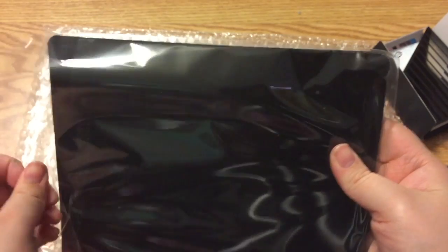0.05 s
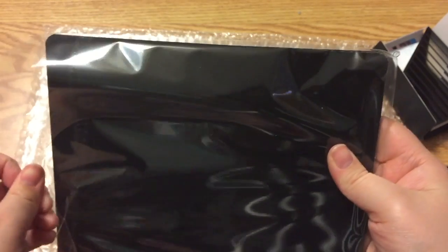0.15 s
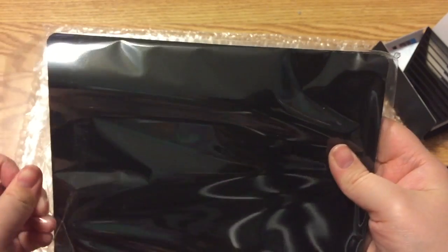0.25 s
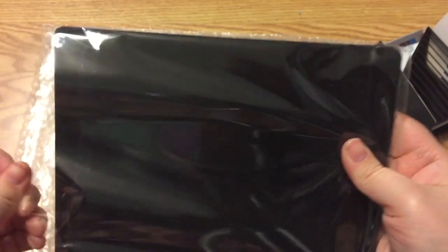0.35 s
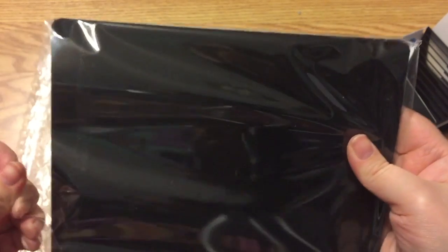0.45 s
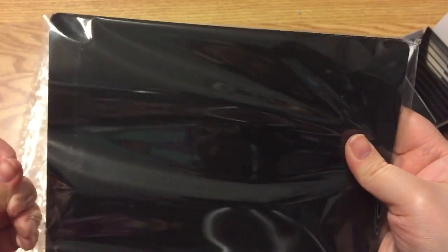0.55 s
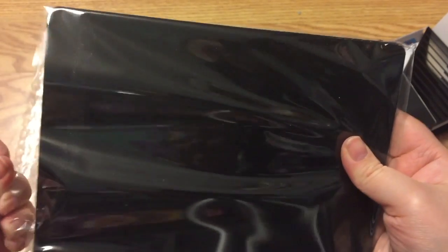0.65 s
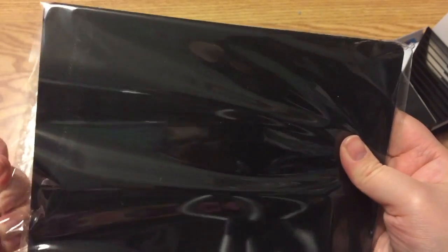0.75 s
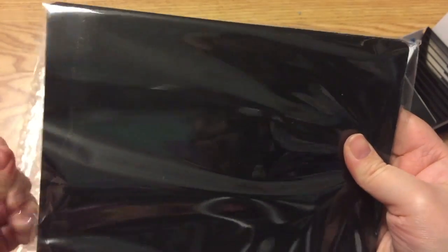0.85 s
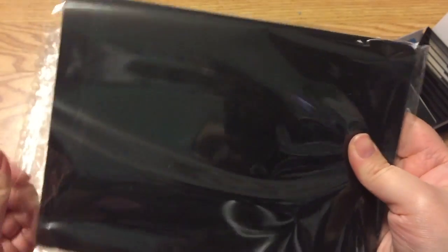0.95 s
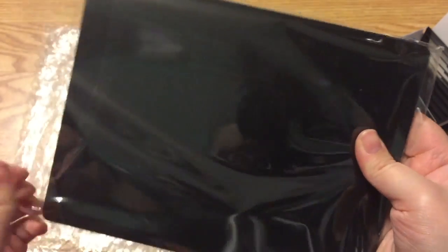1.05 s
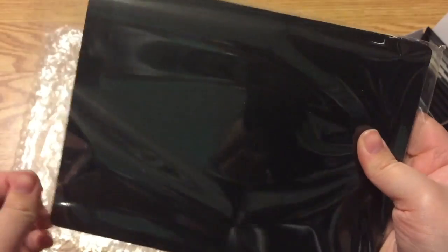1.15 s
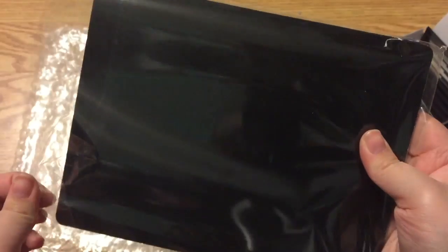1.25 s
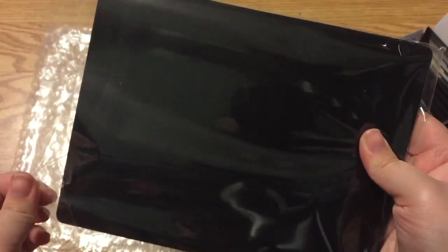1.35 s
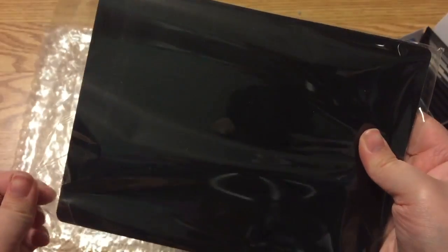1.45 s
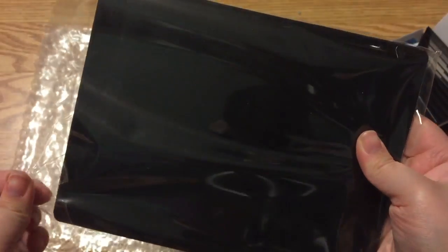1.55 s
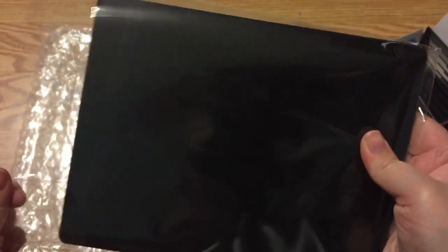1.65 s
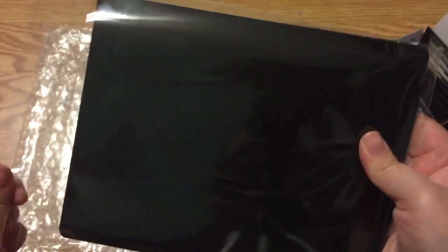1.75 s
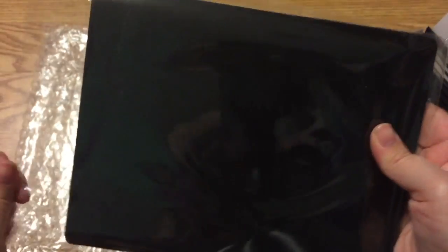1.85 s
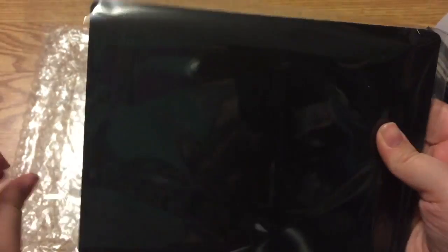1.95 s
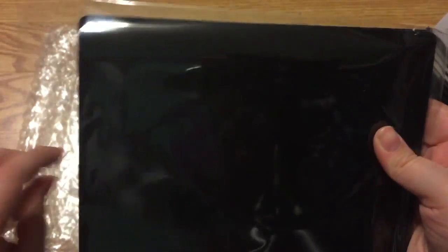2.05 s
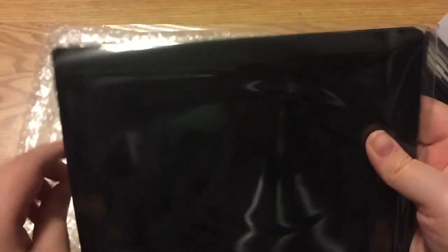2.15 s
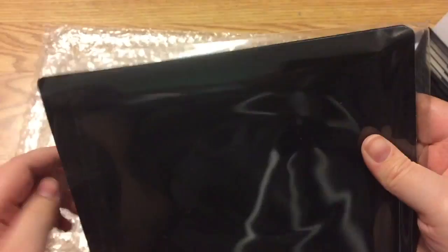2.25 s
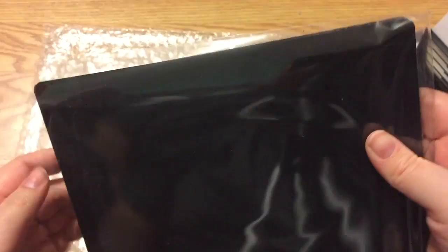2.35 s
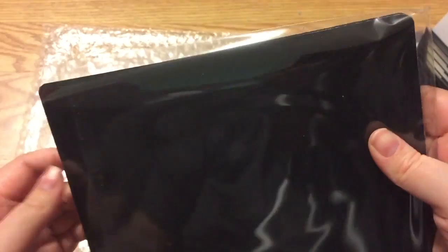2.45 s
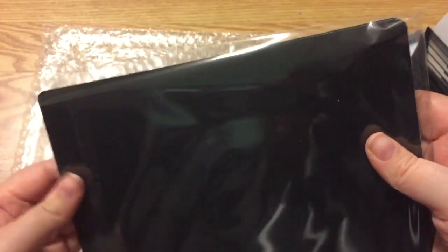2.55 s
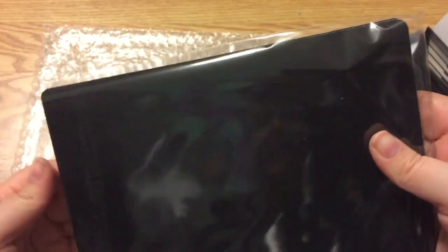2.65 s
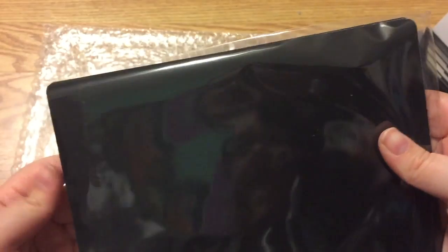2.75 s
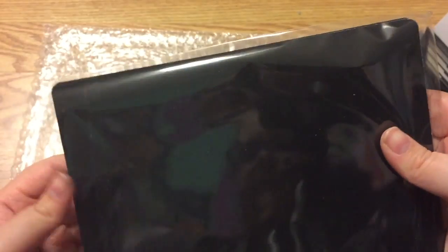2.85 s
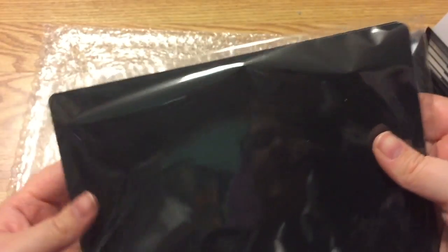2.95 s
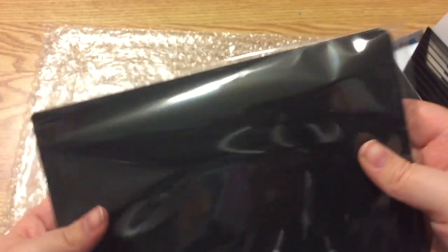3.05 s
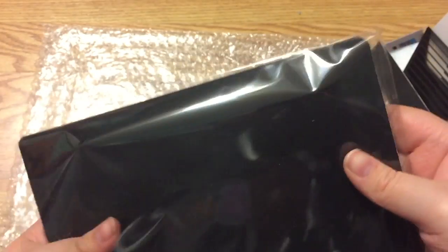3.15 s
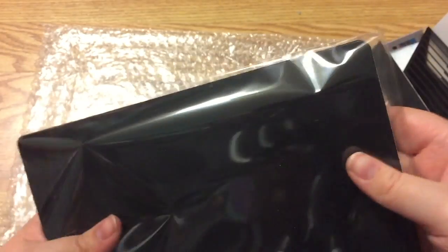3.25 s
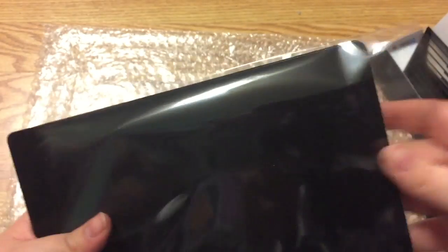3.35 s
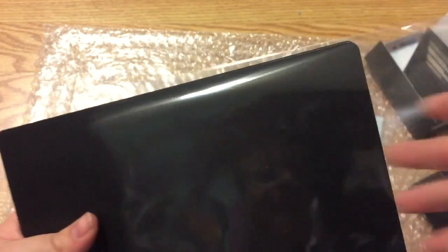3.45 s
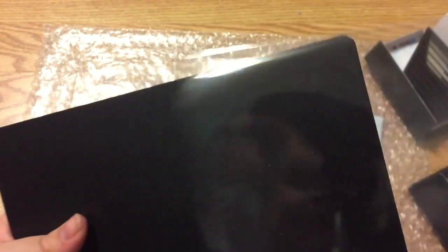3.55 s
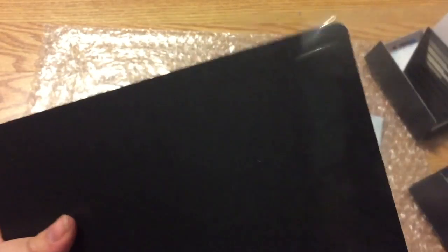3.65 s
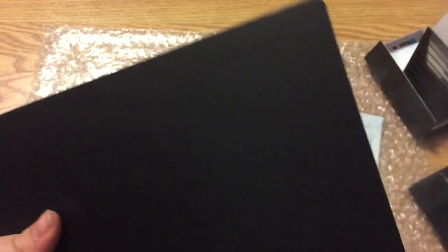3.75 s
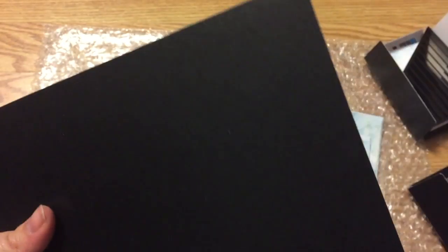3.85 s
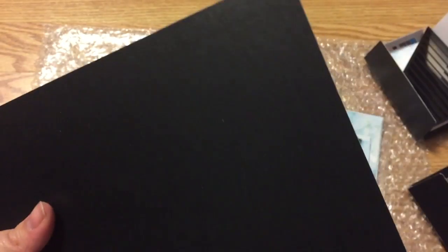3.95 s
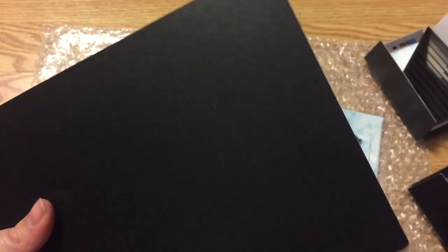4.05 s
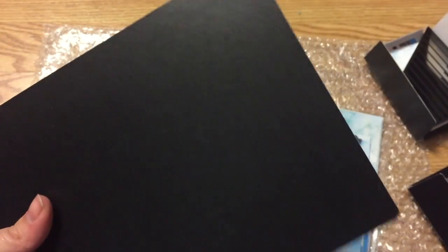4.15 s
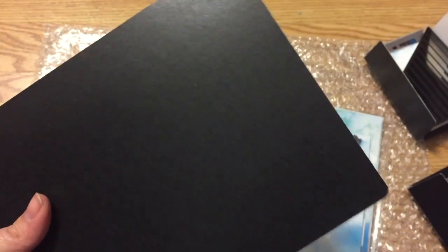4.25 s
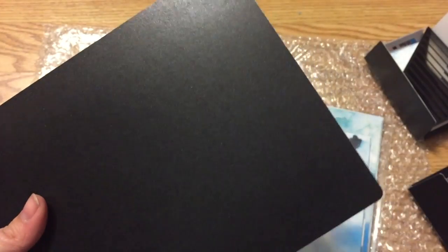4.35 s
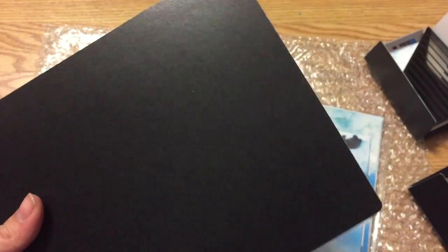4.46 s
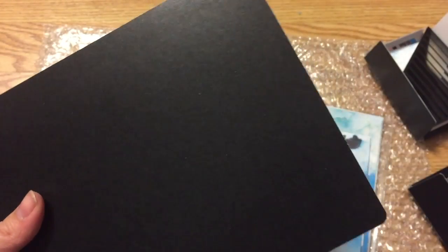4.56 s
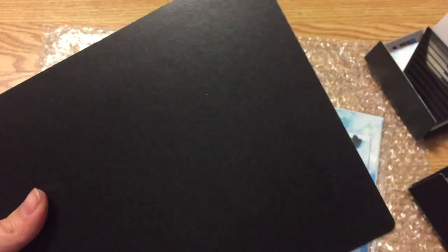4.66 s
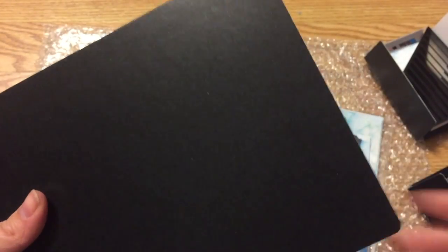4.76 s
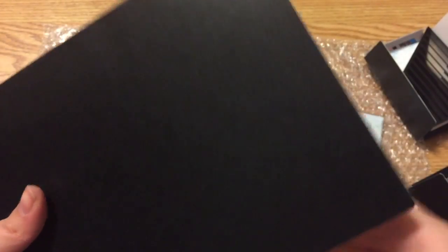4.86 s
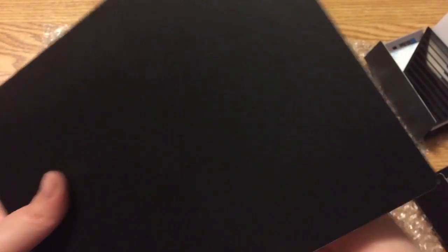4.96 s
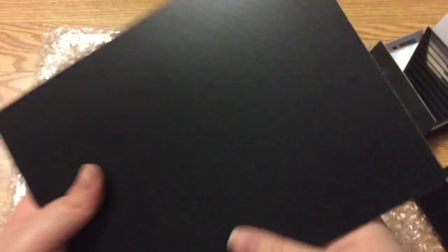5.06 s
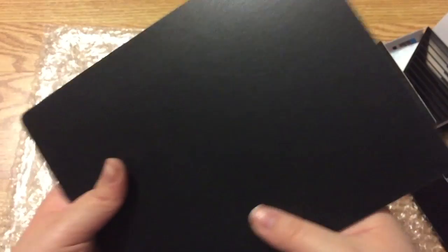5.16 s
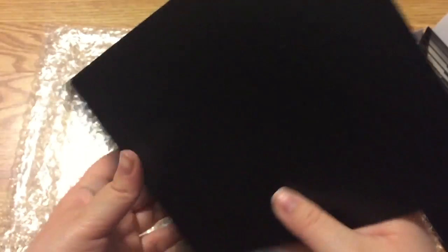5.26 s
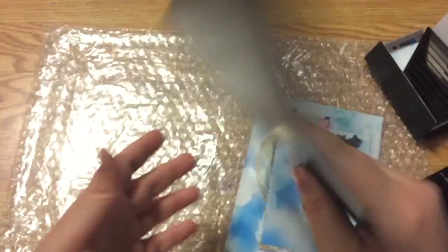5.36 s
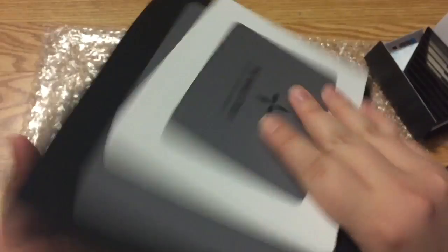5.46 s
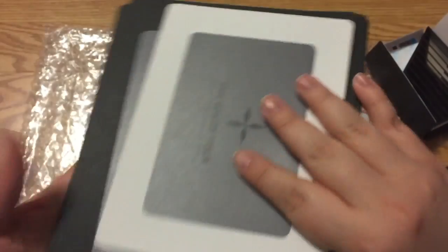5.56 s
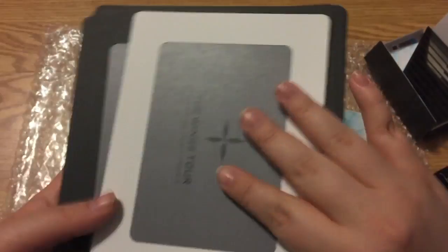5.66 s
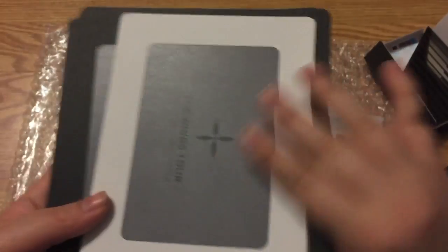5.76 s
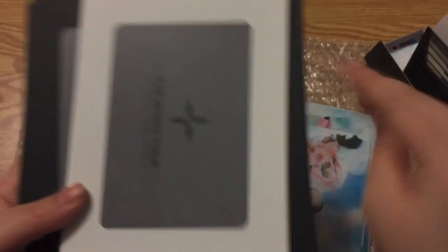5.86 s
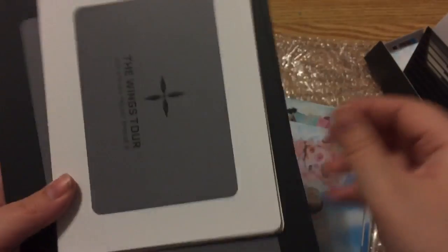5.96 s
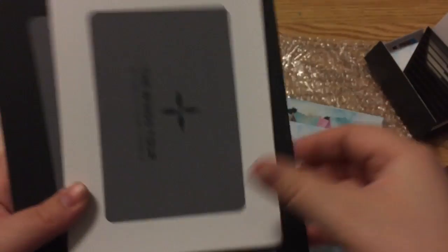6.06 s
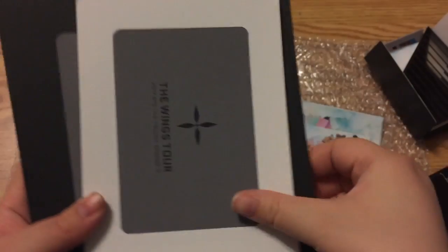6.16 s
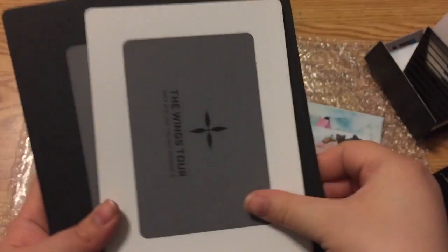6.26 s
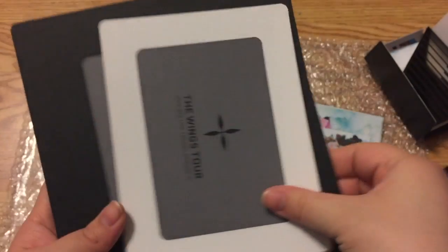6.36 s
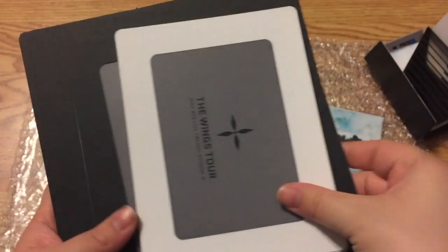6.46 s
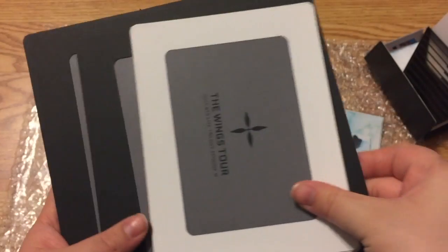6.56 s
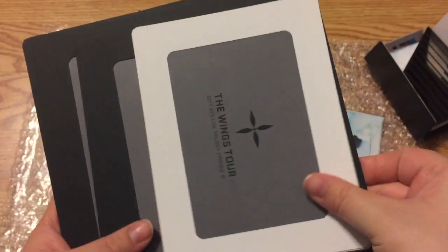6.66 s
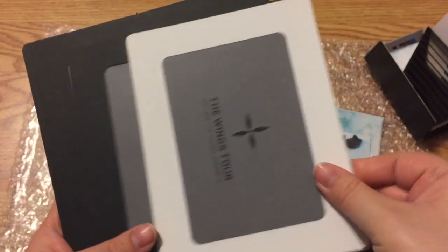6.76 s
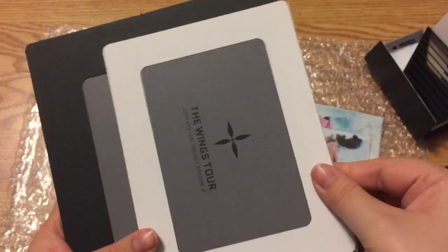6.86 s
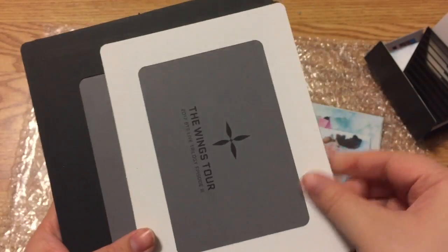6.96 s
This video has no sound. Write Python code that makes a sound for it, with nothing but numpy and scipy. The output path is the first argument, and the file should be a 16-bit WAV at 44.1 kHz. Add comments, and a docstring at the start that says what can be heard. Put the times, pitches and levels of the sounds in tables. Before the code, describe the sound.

A plastic sleeve crackles and snaps in uneven bursts close to the microphone, with dull little thumps from the stiff card inside. The crinkling thins out and gives way to a bright swish as the card is pulled free. Quieter handling follows, with scattered taps and a soft finger rub near the end, at a table in a quiet room with a faint fan hum.

```python
"""At a table in a quiet room, hands pull a stiff card folder out of a clear plastic sleeve, up close,
then turn it over. Creases in the film snap through with a crack, a short rattle and a thump from the card.
Film and fingers stick and slip over the card in short strokes and long slides, and the card flexes low.
Table and walls add a short tail; underneath, a fan hums faintly in the room tone."""
import sys
import numpy as np
from scipy import signal
from scipy.fft import rfft, irfft, next_fast_len
from scipy.io import wavfile
from scipy.ndimage import uniform_filter1d

SR = 44100
rng = np.random.default_rng(int(sys.argv[2]) if len(sys.argv) > 2 else 0)


def output_pcm(signal):
    """Save a mono or channel-first signal as 16-bit PCM at the path in sys.argv[1].

    Samples are clipped to [-1, 1] before scaling.
    """
    pcm = np.clip(np.atleast_2d(signal).T, -1, 1) * 32767
    wavfile.write(sys.argv[1], SR, np.round(pcm).astype(np.int16))


N = 309135
T = np.arange(N) / SR

# creases snapping through: t/s, level/dB, ring f/Hz, card thump relative to the snap/dB
CREASES = [(0.0014, -19.5, 8600, -19), (0.0079, -16.5, 7150, -26), (0.0226, -17, 5970, -26),
           (0.0349, -17, 3600, -23), (0.0502, -21, 9800, -25), (0.0565, -25, 3000, -14),
           (0.0649, -32, 7200.0, -4), (0.0673, -20.5, 4300, -23), (0.1372, -20.5, 10900, -17.5),
           (0.1437, -33, 6840, -18), (0.1698, -37, 4600.0, -32), (0.2159, -43.5, 8300, -28),
           (0.2471, -30.5, 7460, -18), (0.264, -25, 4940, -25), (0.3655, -45, 4100, -12),
           (0.3748, -24.5, 4040, -22), (0.3868, -16, 10700, -13), (0.3919, -17.5, 11900, -21),
           (0.3996, -16.5, 4750, -19), (0.418, -28, 6000, -30), (0.4201, -18, 11700.0, -13),
           (0.4351, -18.5, 6900, -13), (0.5093, -43.5, 2710, -7.5), (0.5629, -36, 7700, -39),
           (0.5815, -55, 3200, -30), (0.6046, -45, 4040, -32.0), (0.6203, -46, 3700, -30),
           (0.6314, -32.0, 2830, -40), (0.6565, -35.5, 7800, -37), (0.6715, -30.5, 8800, -37),
           (0.68, -34, 8600, -37), (0.6866, -34, 6900, -12.5), (0.698, -41, 3470, -6),
           (0.7664, -27.5, 6760, -14.5), (0.831, -40.5, 4230, -28), (0.8437, -38, 2300, -23),
           (0.8736, -44.5, 1500.0, 6), (0.9212, -32, 8400, -11), (0.9518, -27.5, 3370, -30),
           (0.9605, -32, 2150, -15), (0.9697, -22.5, 12200, -21), (0.9962, -35, 9300.0, -6.5),
           (1.1144, -40.5, 3100.0, -4), (1.1236, -34.5, 3460, -10), (1.151, -24.5, 4900, -11.5),
           (1.2135, -24.5, 3600, -13.5), (1.2649, -30, 2400, -5.5), (1.3037, -53, 4600.0, -25),
           (1.3141, -32, 3020, -8.5), (1.3385, -41.5, 4300.0, -10), (1.3573, -43, 3720, -4),
           (1.4507, -30, 11900, -14.5), (1.4622, -33.5, 3750, -30), (1.5112, -31.5, 7800, -46),
           (1.5521, -30.5, 9300, -23), (1.6351, -44.5, 1500.0, 3), (1.6487, -29, 4240, -11.5),
           (1.6785, -14.5, 7700, -33), (1.6854, -16.5, 4300.0, -12), (1.6909, -17.5, 4800.0, -28),
           (1.7007, -20.5, 4340, -10), (1.7072, -22, 3900, -2), (1.7161, -17.5, 1520, -4),
           (1.7207, -24, 1760, -37), (1.8078, -38.5, 3970, -4), (1.8156, -38, 8950, -4),
           (1.8759, -44, 1500, 0.5), (1.907, -34.5, 9400, -27), (1.9132, -33.5, 6600, -7.5),
           (1.9308, -38.5, 3100.0, -2), (1.9416, -34, 4320, -35), (1.9479, -25.5, 1590, -12.5),
           (1.9513, -20, 9700, -49), (1.9639, -40, 3400.0, -22), (2.0038, -36.5, 3400.0, -18),
           (2.0431, -32, 3960, -10.0), (2.0726, -46, 4470, -4), (2.158, -37.5, 3100, -5.5),
           (2.1789, -38, 3350, -3.5), (2.2269, -38, 2100.0, -11), (2.3811, -40.5, 3050, -8),
           (2.4385, -49, 3500, -4), (2.4735, -50, 1819, 5), (2.5062, -27, 9500, -20),
           (2.539, -45, 2460, -14), (2.7075, -52, 3000, -30), (2.7865, -31.5, 5100, -17),
           (2.8959, -48, 2100.0, -8), (2.9077, -45, 2000.0, -27), (2.9625, -44, 8300, -35),
           (3.0485, -35.5, 9860, -15.5), (3.0502, -24.5, 7960, -31), (3.0878, -39.5, 4380, -10),
           (3.1442, -37, 2200.0, -18), (3.1556, -30, 4000, -18), (3.1932, -36.5, 2390, -11.5),
           (3.265, -35, 10700, -15.5), (3.2836, -41, 4080, -10.5), (3.3332, -42, 4640, -28),
           (3.346, -39, 2790, -21), (3.3629, -38, 3580, -28.0), (3.3812, -36, 3100.0, -32),
           (3.6224, -33.5, 5330, -11), (3.691, -25.5, 6750, -18.5), (3.717, -39, 7000, -30),
           (3.877, -46.5, 3580, -28), (3.9151, -49, 4200.0, -10.5), (4.2651, -50, 3550, -22),
           (4.3121, -38, 2800.0, -16), (4.3748, -32.5, 2980, -45.5), (4.4935, -54.5, 4900.0, -5),
           (4.5251, -54.5, 2400.0, -11), (4.7725, -40.5, 9080, -21), (5.3598, -48.5, 4600.0, -5),
           (5.4978, -50, 2300.0, -23), (5.5994, -49.5, 1600.0, -3.5), (5.6117, -44, 1890, -19),
           (5.808, -56, 2194, -18.5), (6.16, -59.5, 1486, -14)]


def crease_snaps(creases, ring_db=5, ring_width=0.2, low_hz=1500, treble_hz=7000, crack_s=0.00017,
                 rattle_t60=0.019, thump_t60=0.031, size=4096):
    """Each crease flips with a crack; the film rattles on for some ms and the card behind it thumps."""
    thump_spectrum = [(59, -52), (100, -16), (614, -3.5), (791, -5.5), (861, -3), (1800, -9.5), (2340, -16),
                      (3960, -120)]  # tone of the knocked card: f/Hz, level/dB
    starts, db, ring_hz, card_db = np.transpose(creases)[:, :, None]
    t = np.arange(size) / SR
    f = np.fft.rfftfreq(size, 1 / SR) + 1
    noise = rng.standard_normal((len(starts), 2, size))
    # big folds roll on longer and crack less sharply than small ones
    big_db = np.maximum(db + 32, 0)
    rattle = undb(-60 * t / rattle_t60 / np.exp(0.0357 * big_db))
    crack = undb(9.5 - 0.55 * big_db) * np.exp(-t / crack_s)
    # thin film radiates no bass; soft folds lose treble, small high facets keep more
    treble_db = -7.5 + 6 * np.log2(ring_hz / 4000)
    body = undb(treble_db / (1 + (treble_hz / f) ** 4)) / (1 + (low_hz / f) ** 2)
    # the size of the facet that flips lifts one band
    facet = 1 + undb(ring_db) * np.exp(-(np.log(f / ring_hz) / ring_width) ** 2)
    film = minimum_phase(noise[:, 0] * (rattle + crack), body * facet)
    knock = noise[:, 1] * undb(-60 * t / thump_t60) * np.tanh(t / 0.00047)
    thump = minimum_phase(knock, eq_curve(thump_spectrum, f))
    snaps = undb(db) * (unit_burst(film) + undb(card_db) * unit_burst(thump))
    out = np.zeros(N + size)
    for at, snap in zip((starts[:, 0] * SR).astype(int), snaps):
        out[at:at + size] += snap
    return out[:N]


def small_creases(per_snap=3, below_db=25, fade_db_per_s=250, spread_db=7, lead_s=0.0012, lag_s=0.022):
    """Each snap shifts the strain: one small crease gives just before, others after; rows like CREASES."""
    starts, db, ring_hz, card_db = np.repeat(CREASES, per_snap, axis=0).T
    wait, size = rng.exponential(size=(len(starts), 2)).T
    ring_scatter, thump_scatter = rng.standard_normal((len(starts), 2)).T
    follows = np.arange(len(starts)) % per_snap > 0
    delay = np.where(follows, lag_s * wait, -lead_s * (1 + np.minimum(wait, 2)))
    small_db = db - below_db - fade_db_per_s * np.maximum(delay, 0) + spread_db * np.minimum(size, 3)
    small_hz = np.clip(ring_hz * np.exp(0.68 * ring_scatter), 1500, 13000)
    thump_db = card_db - 8 + 4 * thump_scatter
    return np.c_[np.maximum(starts + delay, 0), small_db, small_hz, thump_db]


def card_friction(slips_per_s=900, slip_s=0.00043, hiss=1.1, flicker_db=1.5, patchy_db=2.8,
                  scrape_db=-12, scrape_low_hz=250):
    """Stick and slip on the card: dense, uneven micro-bursts over a hiss, patchy from band to band."""
    slip_db = np.minimum(rng.exponential(size=N), 4)
    kicks = (rng.random(N) < slips_per_s / SR) * undb(slip_db)
    slips = np.convolve(kicks, np.exp(-T[:256] / slip_s))[:N]
    grit = (at_level(slips, 0) + hiss) * rng.standard_normal(N)
    size = next_fast_len(N)
    rub_spectrum = rfft(at_level(grit * undb(flicker_db * wander(40)), 0), size)
    octaves = np.log2(np.fft.rfftfreq(size, 1 / SR) / 1000 + 1e-9)
    touches = hand_moves()
    out = np.zeros(N)
    for centre in np.arange(-3, 4.5, 0.25):  # octaves above 1 kHz
        power = np.zeros(N)
        scrape = undb(scrape_db) / (1 + (scrape_low_hz / 1000 / 2 ** centre) ** 2)
        for span, gain, bright in touches:
            # each stroke has its own brightest band: a hump, steeper below, over a flat scrape;
            # the flexing card is a low, narrow hump alone
            width = np.where((centre < bright) | (bright < 0), 1.4, 2.4)
            hump = np.exp(-((centre - bright) / width) ** 2)
            power[span] += (gain * (scrape * (bright > 0) + hump)) ** 2
        band = irfft(rub_spectrum * np.maximum(1 - 4 * abs(octaves - centre), 0), size)[:N]
        out += band * np.sqrt(power) * undb(patchy_db * wander(12))
    return out


def hand_moves(grip_s=0.008, ease=0.072, flex_octave=-2.1):
    """Every stroke, flex and slide on the card as (sample span, gain, brightest band)."""
    # short strokes of film and fingers: start t/s, end t/s, level/dB, brightest band/octaves above 1 kHz
    strokes = [(0.353, 0.367, -56, 1.3), (0.698, 0.723, -53, 0.53), (0.884, 1.078, -45.5, 0.077),
               (1.079, 1.347, -52.5, 0.69), (1.41, 1.65, -62.5, 1.4), (1.86, 2.043, -56, 0.28),
               (2.145, 2.222, -41, 3.05), (2.274, 2.309, -50.5, 1.9), (2.326, 2.417, -49.5, 2.5),
               (2.384, 2.595, -59, 0.33), (2.574, 2.71, -63.5, 3.75), (2.697, 2.75, -53.5, 3.4),
               (4.286, 4.435, -60, 1.7), (5.04, 5.075, -71.5, 2.8), (5.128, 5.161, -73.5, 3),
               (5.2, 5.324, -70, 1.6), (5.722, 5.784, -72, 2.9), (5.796, 5.842, -64, 0.61),
               (5.94, 5.979, -70.5, 1.96), (6.157, 6.232, -66.5, 1.3)]
    # the card flexing in the hand: start t/s, end t/s, level/dB
    flexes = [(0.867, 0.926, -31.5), (2.158, 2.252, -33.5), (3.404, 3.83, -42), (5.602, 5.63, -35.5)]
    # two slides, the sleeve coming off in two tugs and later a finger crossing the card;
    # breakpoints of each: t/s, level/dB, brightest band/octaves above 1 kHz
    slides = [
        [(2.875, -83, 3.3), (2.9, -55.5, 2.4), (2.944, -58, 3.1), (2.97, -45.5, 2.8), (3.04, -50.5, 1.9),
         (3.112, -46, 1.1), (3.19, -46, 2.2), (3.26, -40.5, 1.25), (3.296, -68, 1), (3.34, -47.5, 1.6),
         (3.428, -38, 2.1), (3.53, -41, 1.8), (3.59, -41, 2.5), (3.64, -39.5, 2.7), (3.7, -36, 3.43),
         (3.79, -37.5, 2.73), (3.82, -44.5, 2.3), (3.885, -53.5, 2.4), (3.91, -70, 2.4), (4.06, -83.5, 2.8)],
        [(6.36, -79, 1.5), (6.4, -64, 1.9), (6.445, -50.5, 1.44), (6.526, -56.5, 0.45), (6.61, -58, 1.1),
         (6.66, -63.5, 0.53), (6.76, -55, 0.47), (6.9, -53, 1.5), (6.925, -57.5, 2.1), (6.96, -78, 2.4)],
    ]
    touches = []
    for start, end, db, bright in strokes + [(*row, flex_octave) for row in flexes]:
        span = slice(int((start - 0.1) * SR), int((end + 0.1) * SR))
        ramp_s = grip_s + ease * (end - start)  # long strokes start and stop more gently
        attack = np.clip((T[span] - start) / ramp_s + 0.5, 0, 1)
        release = np.clip((end - T[span]) / ramp_s + 0.5, 0, 1)
        touches.append((span, (attack * release) ** 2 * undb(db), bright))
    for times, db, bright in map(np.transpose, slides):
        span = slice(int(times[0] * SR), int(times[-1] * SR))
        touches.append((span, undb(np.interp(T[span], times, db)), np.interp(T[span], times, bright)))
    return touches


def reflections(x, table_t60=0.13, wall_t60=0.19, wall_db=-17, dull_hz=9000, wet_db=-16):
    """The table returns a short, slightly duller tail, the walls a fainter and longer one."""
    t = np.arange(SR // 2) / SR
    decay = undb(-60 * t / table_t60) + undb(wall_db - 60 * t / wall_t60)
    tail = rng.standard_normal(len(t)) * decay * np.minimum(t / 0.0025, 1)
    tail = signal.sosfilt(signal.butter(1, dull_hz, fs=SR, output="sos"), tail)
    return x + undb(wet_db) * signal.fftconvolve(x, tail / np.linalg.norm(tail))[:N]


def room_tone(db=-60):
    """A near-steady bed of low rumble and hiss."""
    room_spectrum = [(18, -44.5), (40, -13.5), (62, -2.5), (115, -1.5), (350, -21.5), (608, -15), (732, -3),
                     (904, -22.5), (1030, -19), (1450, -23.5), (2220, -24), (2670, -30), (14500, -43),
                     (16500, -60.5)]  # colour of the room's noise: f/Hz, level/dB
    size = next_fast_len(N)
    gain = eq_curve(room_spectrum, np.fft.rfftfreq(size, 1 / SR))
    bed = irfft(rfft(rng.standard_normal(N), size) * gain, size)[:N]
    return at_level(bed, db) * undb(0.29 * wander(1.8))


def fan_hum():
    """The fan housing hums in narrow bands of noise, each wavering in level."""
    housing_bands = [(726.5, 31, -66.5), (827, 9.2, -72), (1027, 130, -74)]  # noisy bands of the housing: f/Hz, width/Hz, level/dB
    out = np.zeros(N)
    for hz, width, db in housing_bands:
        bandpass = signal.butter(2, [hz - width / 2, hz + width / 2], "band", fs=SR, output="sos")
        band = signal.sosfilt(bandpass, rng.standard_normal(N))
        out += at_level(band, db) * undb(0.94 * wander(2.8))
    return out


def undb(db):
    """Decibels to gain."""
    return 10 ** (np.asarray(db) / 20)


def at_level(x, db):
    """Set the RMS level."""
    return x * undb(db) / np.sqrt(np.mean(x ** 2))


def unit_burst(x):
    """Scale each row so that its loudest 4 ms have an RMS of 1."""
    return x / np.sqrt(uniform_filter1d(x ** 2, size=176).max(axis=1, keepdims=True))


def eq_curve(points, hz):
    """Gain at the given frequencies along a curve of (f/Hz, level/dB) points."""
    f, db = np.transpose(points)
    return undb(np.interp(np.log(hz + 1), np.log(f), db))


def minimum_phase(x, gain):
    """Filter by a gain curve without pre-ringing, so attacks stay sharp."""
    cepstrum = irfft(np.log(gain + 1e-5))
    half = cepstrum.shape[-1] // 2
    cepstrum[..., 1:half] *= 2
    cepstrum[..., half + 1:] = 0
    return irfft(rfft(x) * np.exp(rfft(cepstrum)))


def wander(rate_hz):
    """Glide between random values, rate_hz of them a second; spread near 1."""
    hold = int(SR / rate_hz)
    return uniform_filter1d(np.repeat(rng.standard_normal(N // hold + 1), hold), hold)[:N]


def scene():
    """Snaps, fine crackle and friction with their reflections, over room tone and fan; mono."""
    handling = crease_snaps(CREASES) + crease_snaps(small_creases()) + card_friction()
    return (reflections(handling) + room_tone() + fan_hum())[None]


def record(dry, dip_hz=10400, dip_q=12, dip_depth=0.17, shelf_hz=15500, top_hz=16600):
    """The microphone port dips near 10 kHz; the top is cut in two steps."""
    dipped = dry - dip_depth * signal.lfilter(*signal.iirpeak(dip_hz, dip_q, SR), dry)
    below_shelf = signal.sosfiltfilt(signal.ellip(6, 0.1, 40, shelf_hz, fs=SR, output="sos"), dipped)
    shelved = 0.1 * dipped + 0.9 * below_shelf
    return signal.sosfilt(signal.ellip(10, 0.2, 80, top_hz, fs=SR, output="sos"), shelved)


dry = scene()
out = record(dry)
output_pcm(out)
```